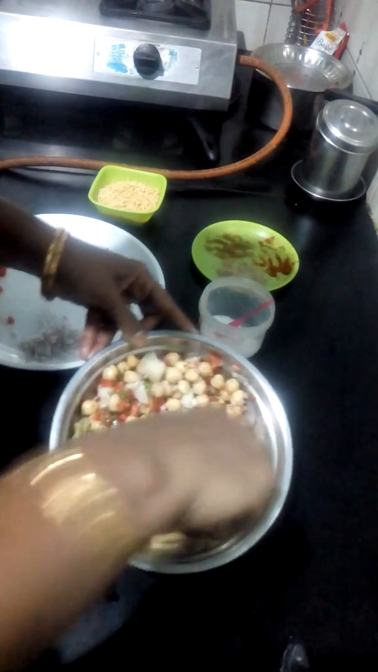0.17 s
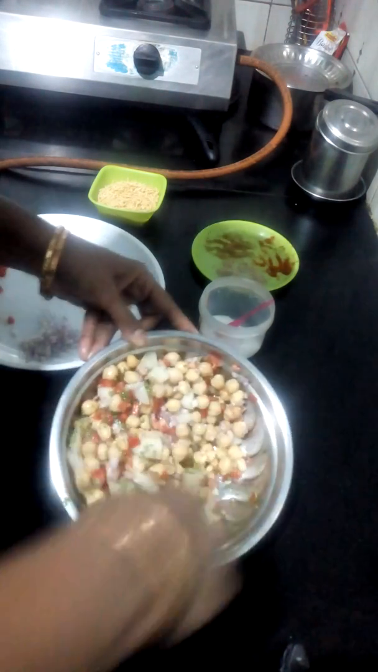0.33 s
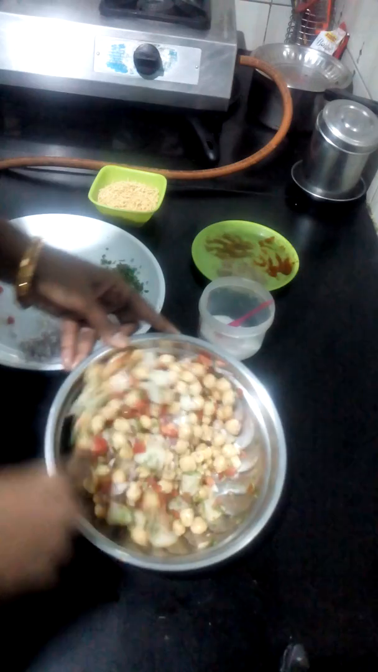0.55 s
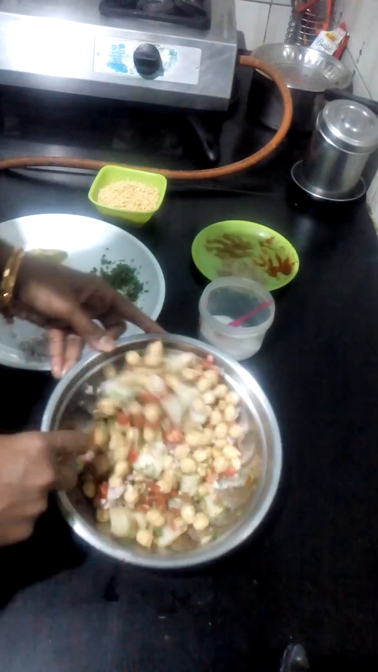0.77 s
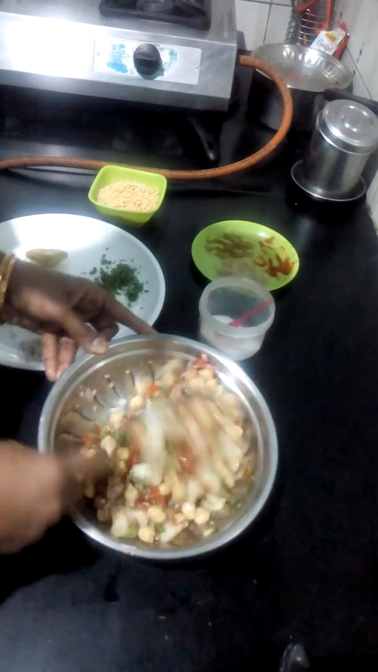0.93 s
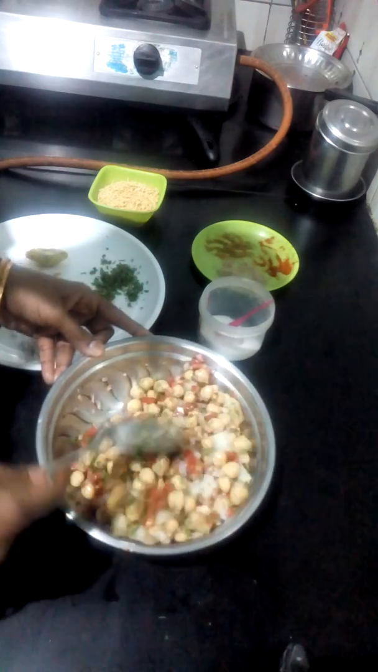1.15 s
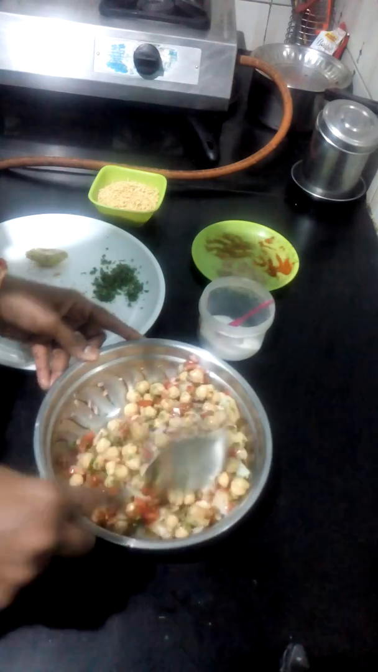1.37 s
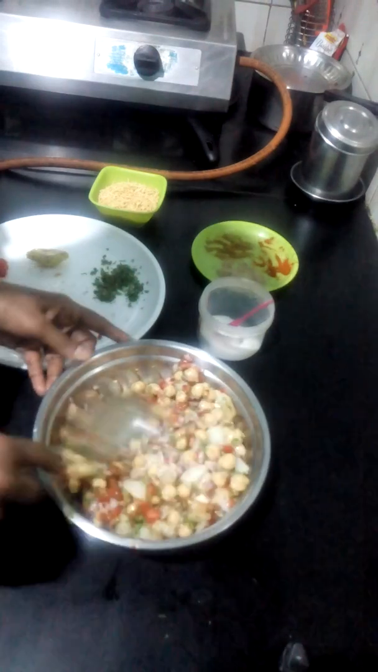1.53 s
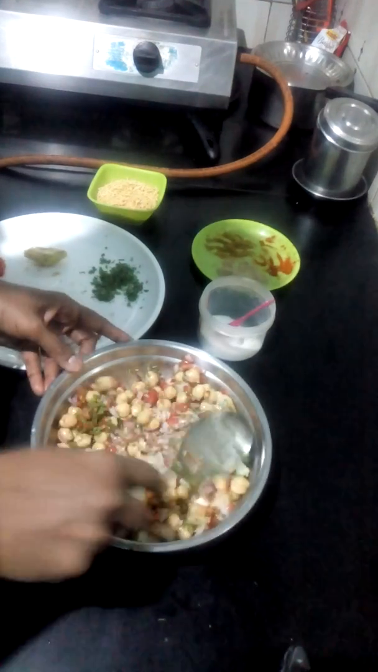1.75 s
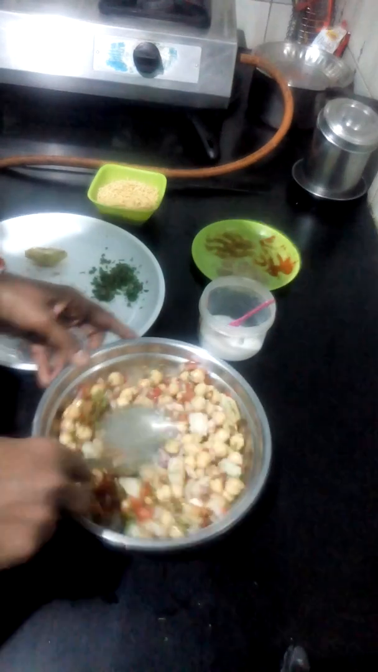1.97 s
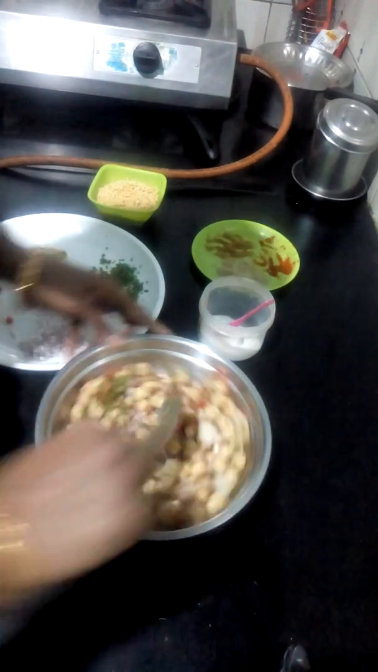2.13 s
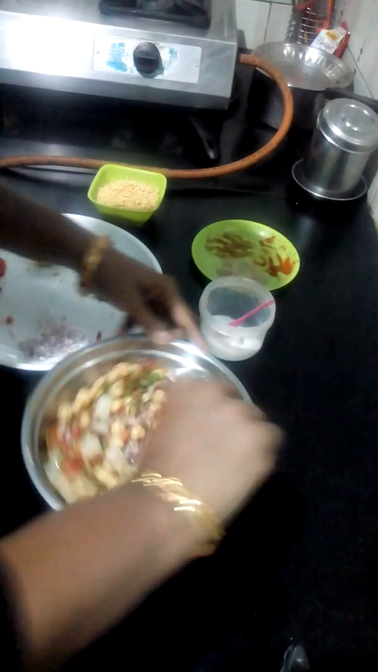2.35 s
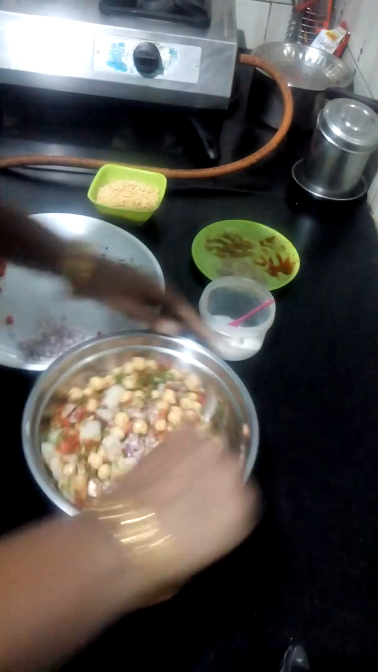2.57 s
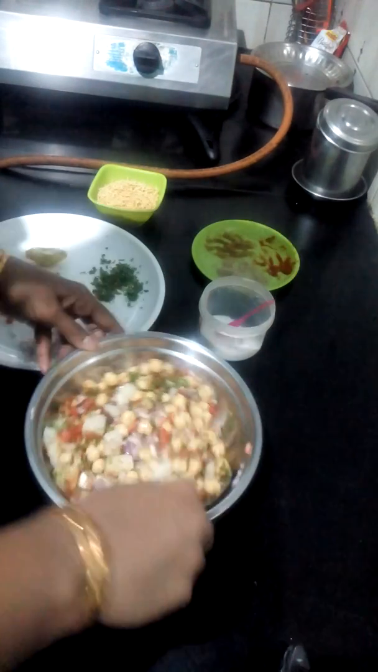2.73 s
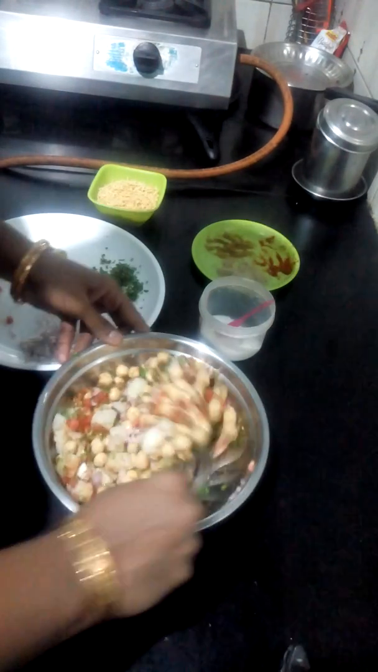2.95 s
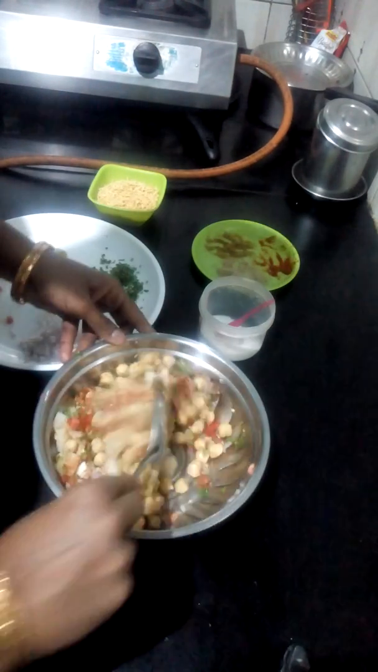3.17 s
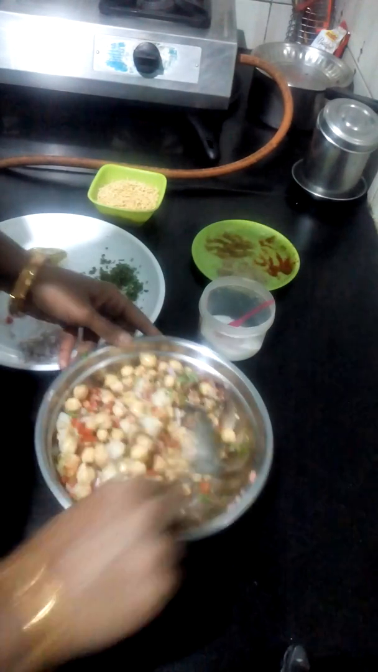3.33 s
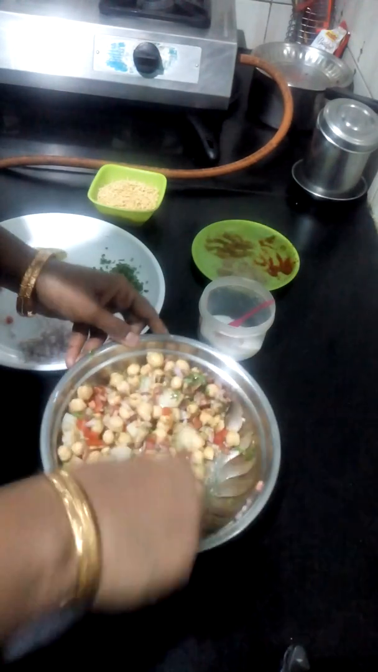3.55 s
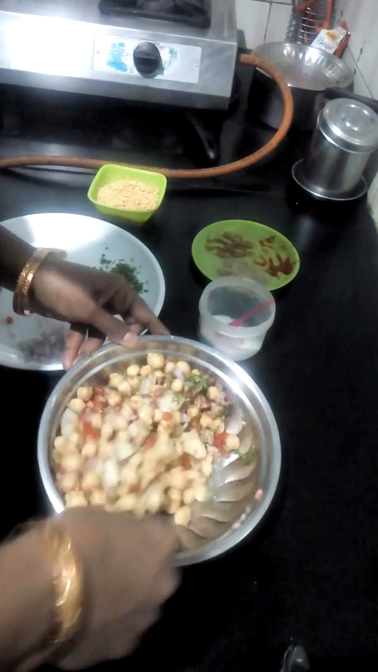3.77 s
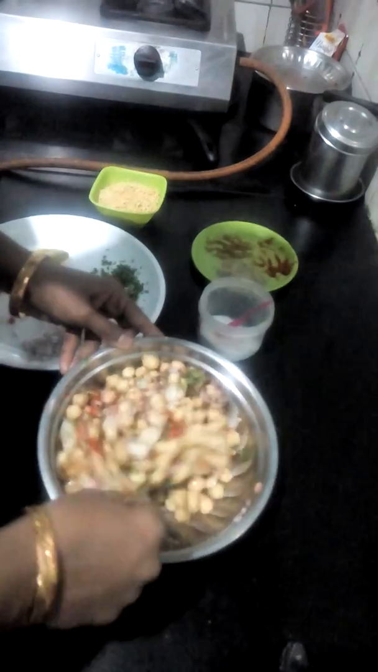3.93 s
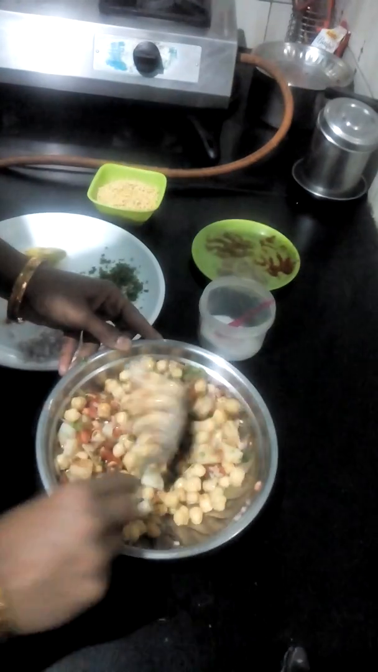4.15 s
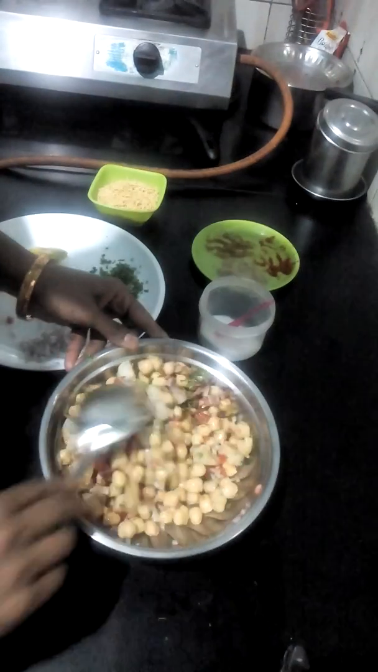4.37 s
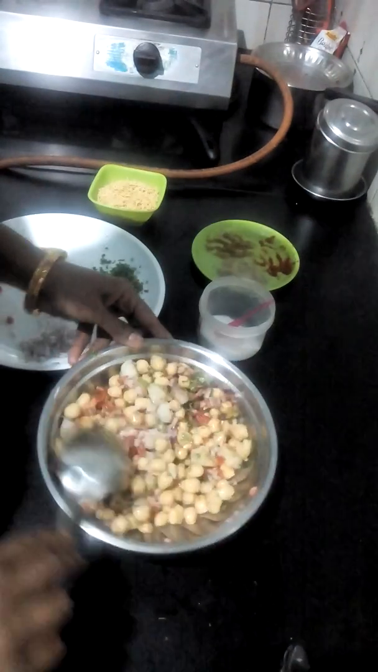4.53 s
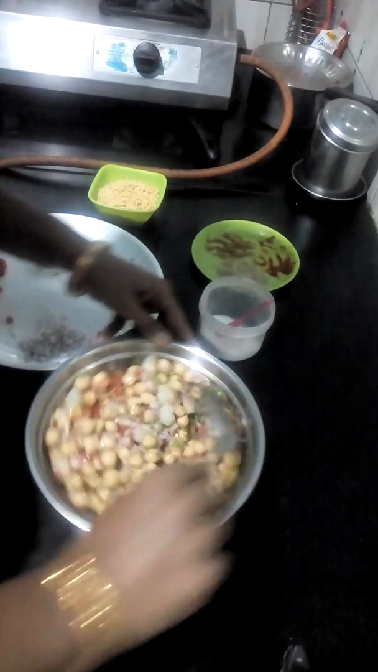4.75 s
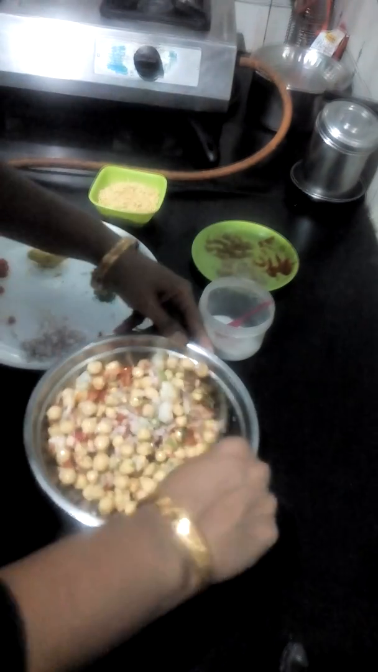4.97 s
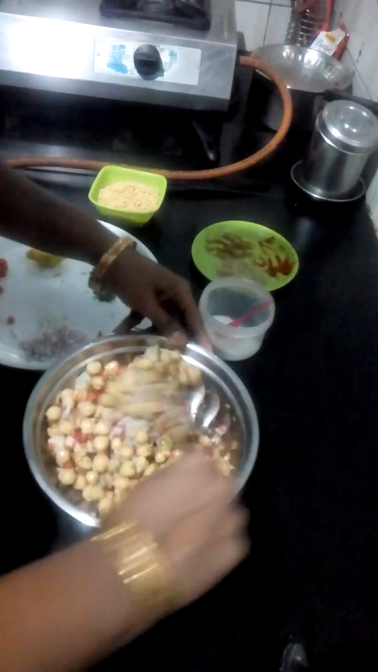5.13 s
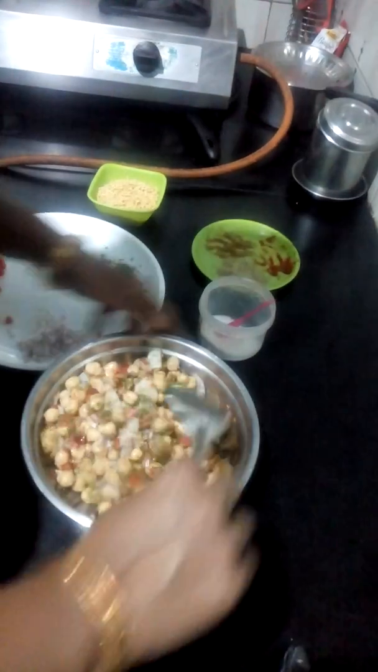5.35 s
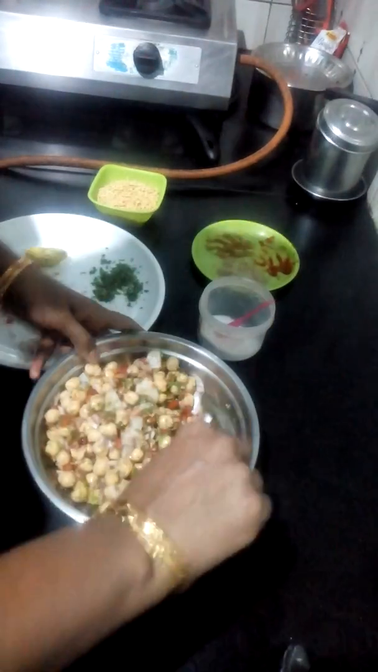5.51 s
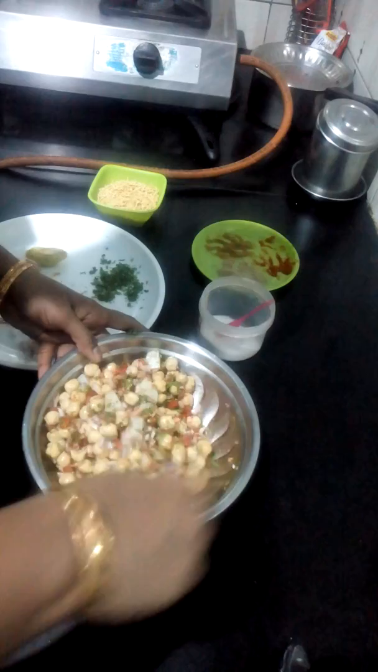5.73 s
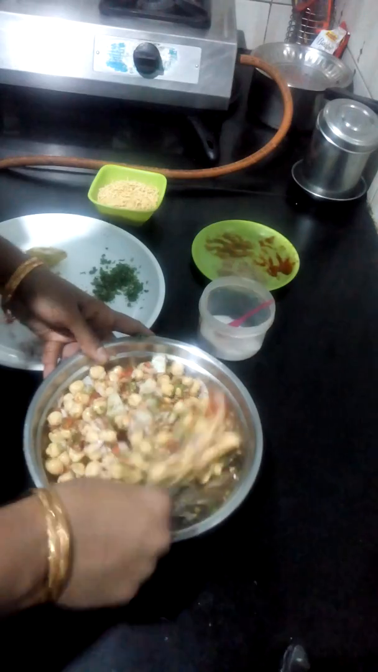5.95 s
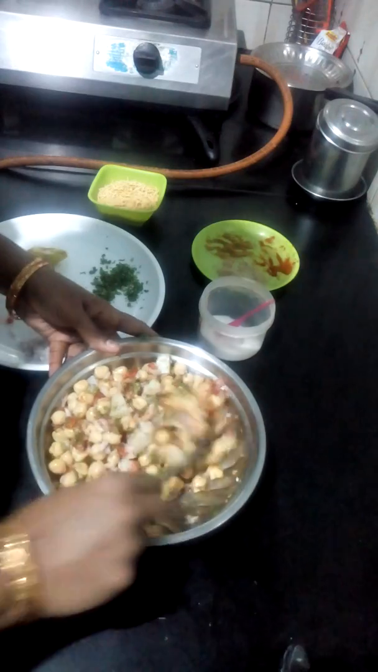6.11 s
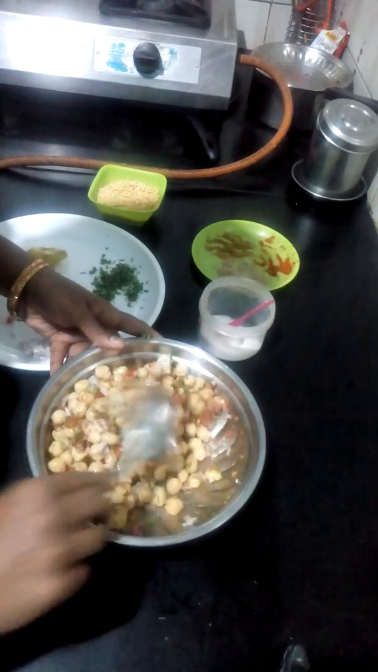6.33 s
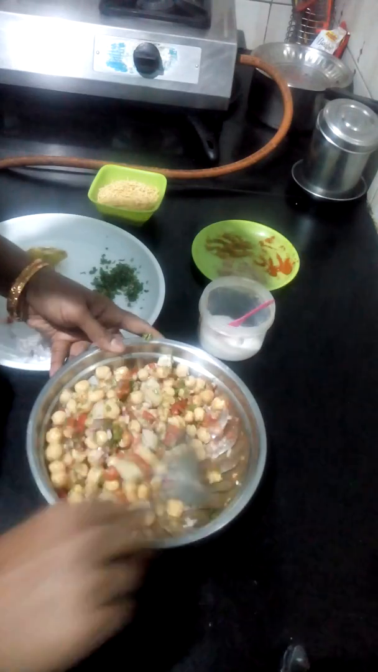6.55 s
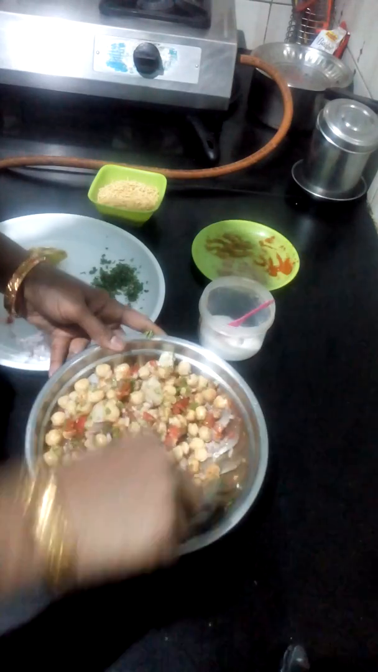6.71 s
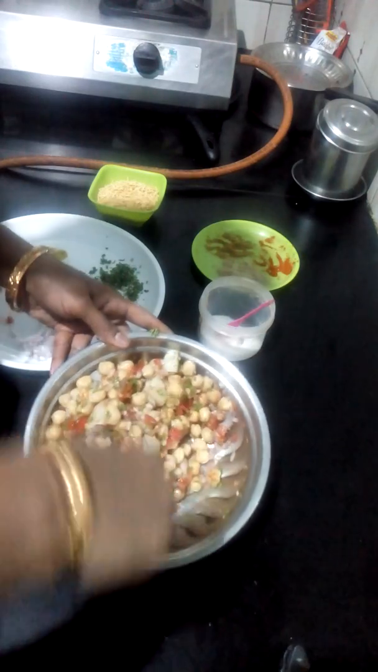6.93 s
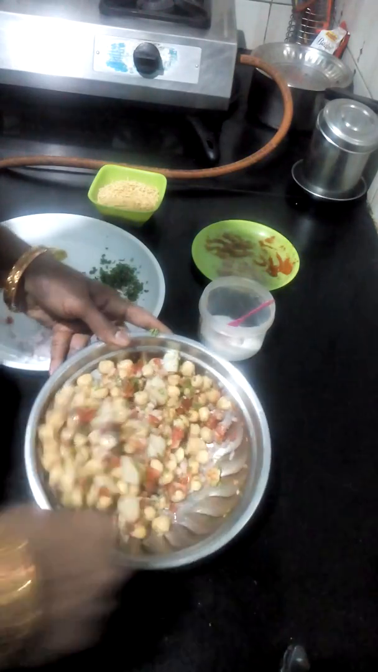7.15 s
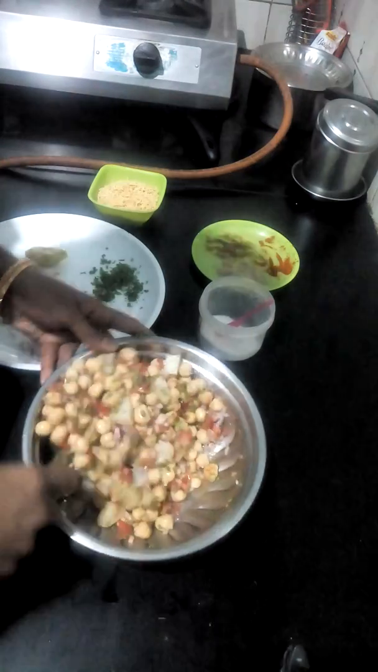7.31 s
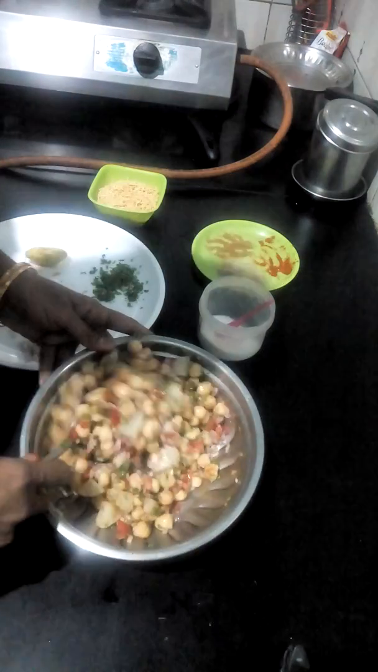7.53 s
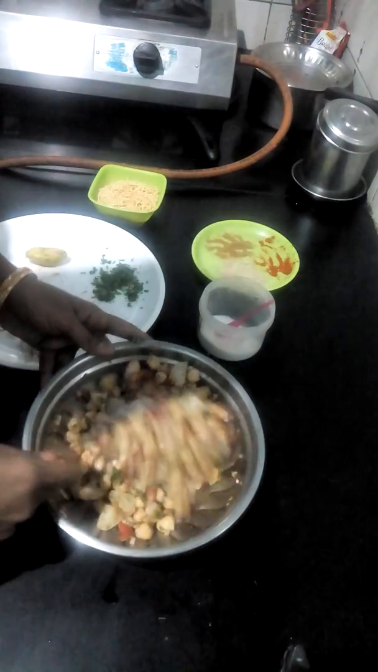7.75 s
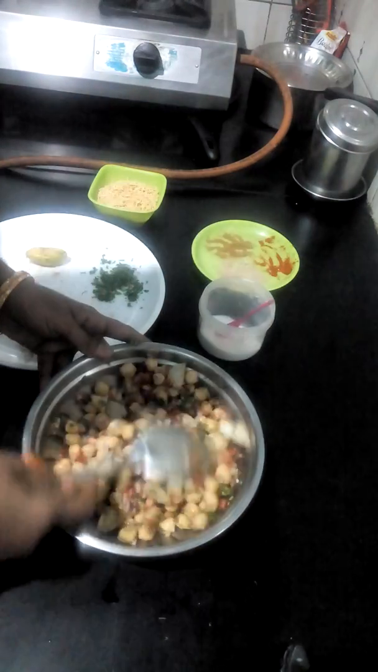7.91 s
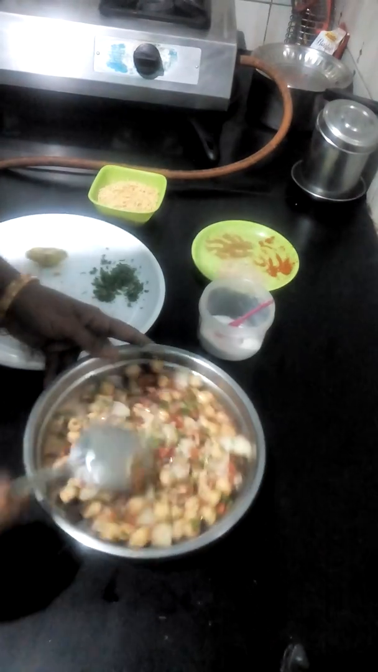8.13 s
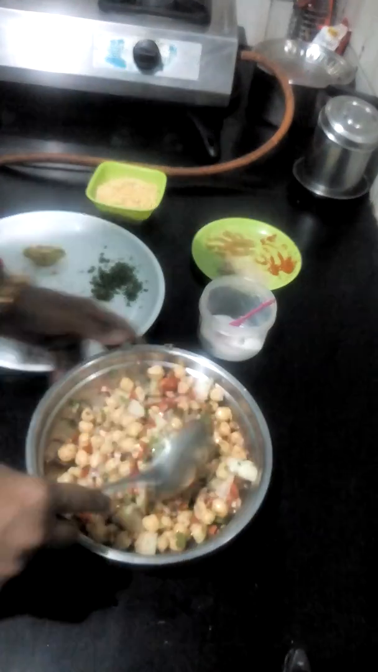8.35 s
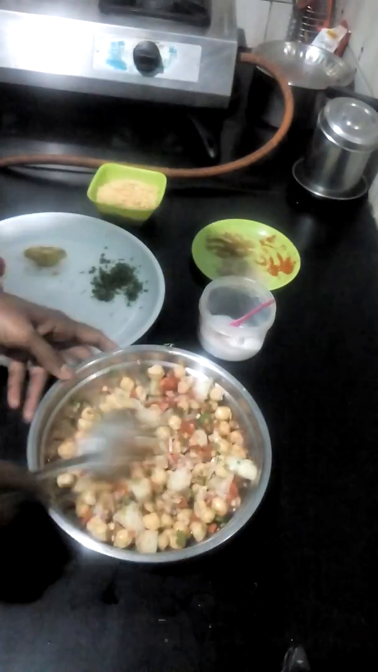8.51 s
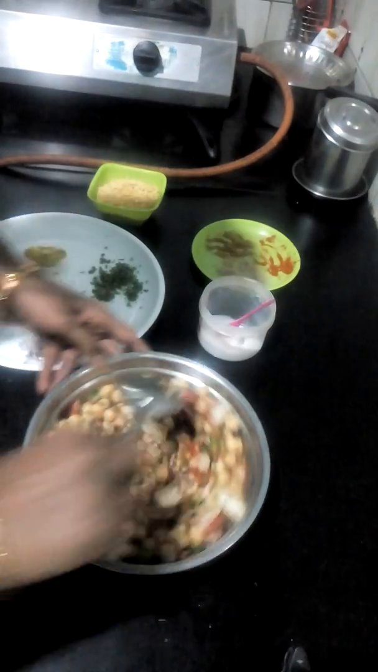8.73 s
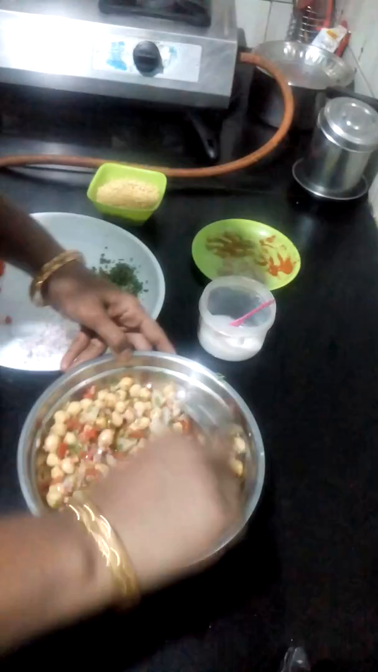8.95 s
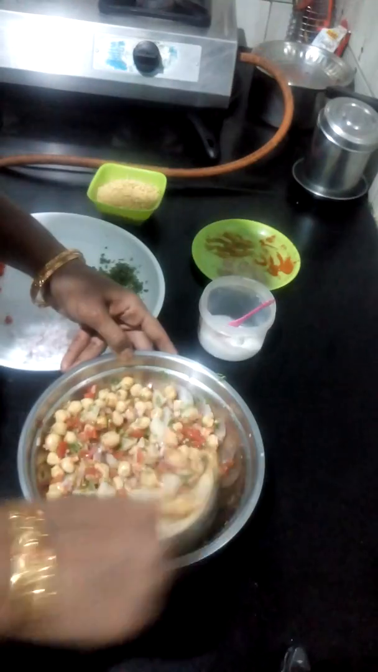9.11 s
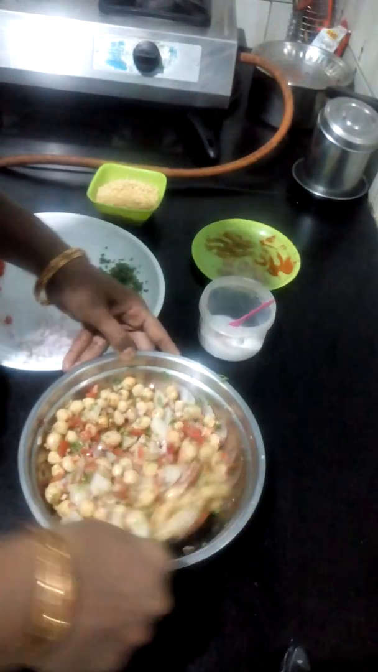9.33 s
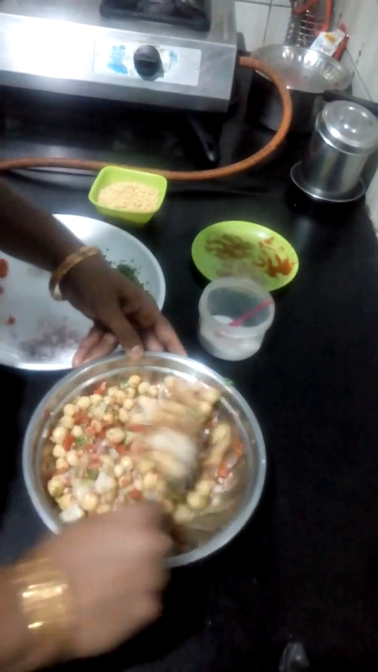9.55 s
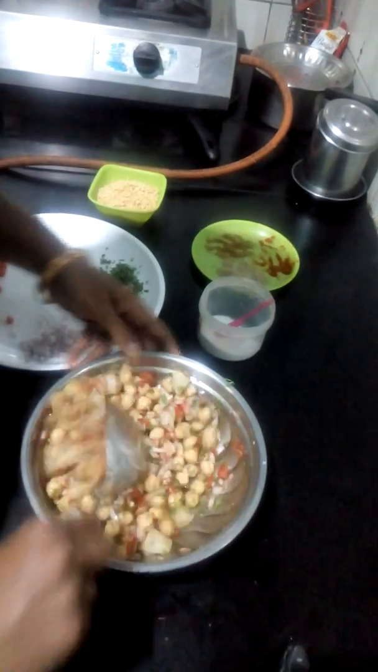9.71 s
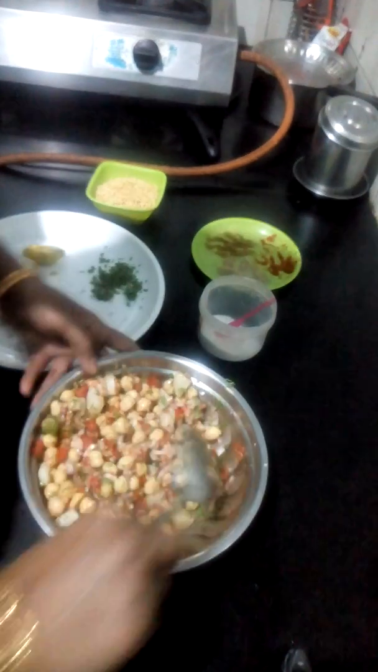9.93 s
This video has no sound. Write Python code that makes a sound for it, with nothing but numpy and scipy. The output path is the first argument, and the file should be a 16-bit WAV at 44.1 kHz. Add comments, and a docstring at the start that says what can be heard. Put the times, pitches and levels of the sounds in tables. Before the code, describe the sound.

Close up, a metal spoon knocks into a bowl and rasps along its wall, first busily, then in separated strokes with quiet gaps. Wet lumps of food patter back after the strokes, most thickly past the middle. Small high bangle rings and dull worktop thumps join in. The indoor room is small, with short reflections, faint low hum and light hiss; the stereo sound leans left.

```python
"""Knock, grate, rustle, plop: a steel spoon turns a chickpea salad in a steel bowl, in a small, quiet kitchen.
Seven short strokes knock (noise chatter, short bowl modes) and grate (stick-slip snaps through the same steel).
Some slips rasp on a gliding note, and hard pushes boom in the worktop. Wet food rustles as sparse ticks and
plops back as showers of soft lumps; the free spoon and bangles ring as small sets of dying modes.
Behind it lie low room noise, a wavering hum and a thin hiss that sets in, overshoots and settles."""
import sys
import numpy as np
from scipy import signal
from scipy.fft import rfft
from scipy.io import wavfile
from scipy.ndimage import uniform_filter1d

SR = 44100
rng = np.random.default_rng(int(sys.argv[2]) if len(sys.argv) > 2 else 0)


def log_audio(samples):
    """Write samples as a 16-bit WAV file to the path given in sys.argv[1]."""
    # one column per channel
    frames = np.atleast_2d(samples).T
    # limit to full scale, then quantise
    limited = np.clip(frames, -1, 1)
    pcm = np.round(limited * 32767).astype(np.int16)
    wavfile.write(sys.argv[1], SR, pcm)


N = 440118
TIME = np.arange(N) / SR

# Spoon against bowl. Each row: start in seconds, strength in dB before the trim of all knocks,
# weight of the low tones in dB against the strength, brightness in dB against the strength, contact time in ms.
KNOCKS = [(0.0357, -38, -7, -3, 2.6), (0.1139, -44, -17, -7, 1.3), (0.353, -37, -10, -7, 1.8),
          (0.3663, -40, -0.5, -5, 14), (0.4665, -30, -17.5, -7.5, 5), (0.613, -33, -11, -17.5, 2.4),
          (2.35, -29.3, -1.5, -9.5, 2.3), (2.565, -41, -21.5, -13, 1.1), (2.7869, -46, -26.5, -19, .5),
          (2.8127, -31, -16, -9, 1.7), (3.4317, -30.5, -11.5, -10.5, 1.6), (3.443, -35.5, -10, -5, 7.7),
          (3.4603, -35, -5, -13, 1.5), (3.5863, -34, -8.5, -5.5, 1.2), (3.7013, -35, -5, -13, 3.7),
          (3.798, -43.5, -13, -22, 7), (3.8753, -32.5, -1.5, -22, 2.8), (5.5048, -35.5, -2.5, -11, 2.5),
          (5.518, -33, -14, -10, 13), (5.712, -44, -20, -4, 3.1), (5.744, -45, -10, -22, 9),
          (6.607, -46.5, -15, -10, 0.63), (6.6194, -36.5, 1, -7.5, 1.3), (6.689, -63, -19, -1, 1.2),
          (6.782, -39, 0, -11, 7.4), (6.8656, -42.5, -18, -13, 6), (6.997, -39, 3, -24, 4),
          (7.072, -44, -23, -9.5, 2.9), (7.2795, -39, -11, -13.5, 1.6), (8.922, -34, -9.5, -5.5, 3),
          (9.018, -34, -8.5, -8.5, 2.8), (9.04, -37, -19, -21, 7), (9.22, -42.5, -6, -16, 2.4),
          (9.411, -40, -51, -8.5, 5)]
# Edges in Hz of a knock's four bands: thump, body, clank and brightness.
KNOCK_BAND_EDGES = [180, 550, 1300, 7500, 15500]
# One short curve a stroke. Each row: time in seconds, relative pressure on the wall in dB,
# relative hiss of the spoon's edge in dB.
STROKES = [
    [(0.05, -36.5, -55), (0.15, -51, -51.5), (0.24, -38.5, -48), (0.32, -51, -68), (0.4, -42, -50),
     (0.5, -34, -57), (0.56, -52, -58), (0.6, -35, -56), (0.65, -46, -52)],
    [(2.37, -34.5, -53), (2.44, -39.5, -49.5), (2.5, -42.5, -56), (2.61, -49, -55.5), (2.66, -45.5, -48.5),
     (2.76, -57, -83), (2.81, -41, -50)],
    [(3.45, -38, -47), (3.52, -38, -50), (3.66, -53, -60), (3.78, -40, -52.5), (3.88, -51.5, -59),
     (3.96, -41.5, -53), (4.01, -52, -69)],
    [(5.52, -53, -63), (5.6, -41.5, -48.5), (5.7, -44.5, -52.5), (5.77, -53, -60), (5.88, -43, -55),
     (5.93, -37.5, -46), (5.97, -55, -76)],
    [(6.63, -41, -66), (6.71, -49.5, -58), (6.76, -43, -54), (6.82, -45.5, -54), (6.89, -40.5, -50.5),
     (6.99, -42, -56)],
    [(7.01, -44, -64), (7.1, -50.5, -61), (7.17, -43.5, -61), (7.21, -48.5, -62), (7.26, -42.5, -62)],
    [(8.94, -40, -55), (9.06, -48.5, -50.5), (9.13, -40.5, -50), (9.21, -41.5, -50.5), (9.27, -47.5, -62),
     (9.37, -53.5, -63), (9.43, -40, -52), (9.48, -56, -64)],
]
# How each stroke digs in. Each row: extra thump of its first blows in dB, relative rumble of the pushed food in dB,
# fall of that rumble in dB per second as food spills off the spoon.
LOADS = [(24, -53.5, 4.5), (1, -43, 77), (18.2, -51, 3.5), (19.9, -46, 110), (9, -48, 16), (10, -51.5, 61),
         (5, -54.5, 28)]
# The spoon rasps on one gliding note. Each row: start in seconds, end in seconds, start pitch in Hz,
# end pitch in Hz, level in dB before the trim of all rasps.
RASPS = [(0.06, 0.118, 553, 700, -51), (0.234, 0.316, 394, 480, -48.5), (2.324, 2.338, 4800, 4840, -42.5),
         (2.681, 2.702, 3280, 1650, -41.5), (3.784, 3.826, 2600, 1680, -40.5),
         (3.902, 4.003, 1400, 900, -58), (4.703, 4.99, 1920, 2520, -67.5), (4.752, 4.95, 4200, 4670, -68),
         (4.9, 4.966, 5400, 5900, -54), (5.73, 5.77, 1450, 1220, -49.5), (5.799, 5.93, 1430, 1790, -52.5),
         (6.005, 6.112, 1400, 1450, -67), (6.986, 7.026, 334, 262, -43), (7.28, 7.32, 4320, 4480, -49),
         (8.258, 8.336, 2140, 2450, -67), (9.147, 9.363, 2050, 2390, -50)]
# The bowl rocks on the worktop. Each row: start in seconds, level in dB before the trim of all bumps.
BUMPS = [(0.038, -60), (1.248, -60), (3.435, -52), (3.699, -57), (3.878, -68), (6.619, -64), (6.997, -54),
         (7.647, -64)]
# Spoonfuls falling back. Each row: start in seconds, level in dB before the trim of all plops,
# firmness (pat over thud) in dB, wetness in dB against the level.
PLOPS = [(0.835, -58.5, -7, -27), (0.877, -66, -11, -22.5), (0.957, -59.5, -12.5, -24),
         (0.988, -57.5, -10, -27), (1.03, -62, -2, -13.5), (1.129, -65.5, -1, -8.5), (1.559, -58, 0.5, -11),
         (1.624, -67.5, 1, -9.5), (3.371, -65, 8, 8), (4.045, -55, 11, -16), (4.182, -58, 12, -21),
         (4.205, -62.5, 9, -3), (4.518, -61.5, -1, -8.5), (4.713, -61.5, -8, -19), (4.925, -70, 16, 13),
         (5.279, -63, 11, -34), (6.057, -71, -6, 7.5), (6.5027, -53, -1.5, -23.5), (6.585, -63, 6, -6),
         (7.516, -52.5, 8.5, -24), (7.545, -55.5, 2, -19.5), (7.621, -53, -17, -18.5),
         (7.815, -57.5, -15.5, -9.5), (7.99, -64.5, 0, -6), (8.106, -54.5, -12, -16.5),
         (8.135, -65.5, -11, -2.5), (8.234, -62, -6, -14), (8.565, -48.5, 20.5, -21.5),
         (9.722, -58, 0, -13.5), (9.76, -53, 15, -25), (9.786, -53, 6, -13)]
# Edges in Hz of a plop's four bands: thud, pat, squelch and tick.
PLOP_BAND_EDGES = [130, 450, 1200, 3200, 8000]
# The spoon ringing free. Each row: start in seconds, pitch in Hz, level in dB, time to fall by 60 dB in seconds.
SPOON_RINGS = [(7.281, 4480, -46, 0.061), (8.387, 3990, -60.5, 0.05), (9.726, 4495, -69.5, 0.33),
               (9.785, 4500, -66, 0.18)]
# Bangles touching. Each row: start in seconds, level in dB.
TINKLES = [(0.227, -53), (0.261, -42.5), (0.287, -41), (0.358, -47), (.475, -35), (1.363, -54),
           (2.325, -58), (5.498, -53), (6.686, -41), (8.572, -71), (8.639, -63)]

# Modes of the loaded bowl. Each row: pitch in Hz, relative level in dB, time to fall by 60 dB in seconds.
BOWL_MODES = [(242.8, -1, .28), (274, 0.5, 0.19), (348, -2, 0.22), (409.2, 0, 0.22), (495, 2, 0.18),
              (618.5, -14.5, 0.13), (816, 2.5, 0.16), (899, -2, 0.24), (955, -8, 0.57), (1382, -8.5, 0.4),
              (1414, -6, .17), (1640, -17.5, 0.17), (1730, -6, 0.13), (1930, 0, 0.18), (2190, 0.5, 0.13),
              (2590, 1.5, 0.12), (2624, -2, 0.3), (3200, -6, 0.19), (3456, -22, .16), (3790, -6.5, 0.14),
              (4000, -3.5, 0.24), (4090, -11, .18), (5290, 6, 0.07), (5420, -5.5, .2), (5620, -5.5, 0.26),
              (5830, -11, 0.3), (6520, -10, 0.15), (6910, -4, 0.29), (8600, 9, 0.22)]
# Modes of the worktop. Each row: pitch in Hz, relative level in dB, time to fall by 60 dB in seconds.
WORKTOP_MODES = [(69, -9.5, 0.85), (89, -25, 0.34), (110, -5, 0.19), (124.5, -2.5, 0.63), (163.4, -8, .25),
                 (196, -9, 0.34)]
# Modes of a bangle. Each row: pitch in Hz, relative level in dB, time to fall by 60 dB in seconds.
BANGLE_MODES = [(1370, -23.5, 0.11), (4400, -18.5, 0.079), (5700, -14, .1), (7000, -19, .08),
                (8240, -18, 0.08), (8700, -9.5, 0.11), (11650, -15, 0.068), (14460, -10, 0.092),
                (14400, -6.5, .11), (15070, -7, 0.072), (15400, -0.5, 0.053)]
# Close modes of the spoon. Each row: multiple of the main pitch, relative level in dB.
SPOON_MODES = [(.9, -28), (0.952, 1), (0.978, 23), (1, 5), (1.04, -14)]

# Colour of a hard contact. Each row: frequency in Hz, relative density in dB per Hz.
CLANK_COLOUR = [(59, -39.5), (100, -2), (166, -24), (253, -2.5), (640, -3.5), (758, -14), (917, -3.5),
                (1290, -4.5), (2220, 2.5), (2930, -1.5), (4100, 3), (4560, -3.5), (6810, -1), (11300, -21),
                (15500, -11)]
# Colour of grating steel. Each row: frequency in Hz, relative density in dB per Hz.
GRATE_COLOUR = [(88, -34), (150, -14.5), (381, -9), (481, -18.5), (561, -9.5), (1110, -15), (1200, -13),
                (1760, -14.5), (2180, 0), (2980, -7.5), (3830, -3), (5760, -6), (8660, -9), (10700, -21),
                (15500, -9.5)]
# Colour of damp food shifting. Each row: frequency in Hz, relative density in dB per Hz.
RUSTLE_COLOUR = [(150, -14.5), (400, -0.5), (1000, -7), (2100, 0.5), (3000, -6), (6000, -7.5), (9000, -18),
                 (15000, -29)]
# Colour of the still kitchen. Each row: frequency in Hz, relative density in dB per Hz.
STILL_COLOUR = [(20, -29), (35, -14), (52, -21), (64, -3), (88, -11.5), (120, -4.5), (180, -6.5),
                (320, -14.5), (600, -17), (1150, -27), (2200, -26.5), (3300, -32.5), (6000, -37),
                (12000, -43), (15500, -34.5)]
# Faint hum. Each row: pitch in Hz, level in dB.
HUM = [(64.6, -82.5), (86.1, -73), (119, -74.5), (237, -80.5)]
# Colour of the thin hiss. Each row: frequency in Hz, relative level in dB.
HISS_COLOUR = [(200, -6), (1300, -8.5), (2300, -0.5), (3200, -1), (6000, 3), (7200, 1.5), (8500, -8),
               (11000, -22), (15000, -11.5)]
# The kitchen's decay. Each row: frequency in Hz, time to fall by 60 dB in seconds.
KITCHEN_DECAY = [(200, 0.42), (530, 0.29), (1400, 0.39), (3700, 0.34), (9700, 0.3), (15000, 0.19)]
# The two microphones. Each row: frequency in Hz, left minus right in dB.
EARS = [(60, 11), (92, 3), (140, 4.5), (210, 7.5), (330, 5.5), (500, 10), (770, 8.0), (1170, 11.5),
        (1790, 18), (2740, 17), (4190, 13.5), (6410, 8.5), (9810, -0.5), (15000, 8)]

# a blow at the start of a stroke lands on the bowl's floor: it thumps deeper and rings more freely than on the wall
PLUNGE_S = 0.09  # how fast the blows move from floor to wall
ENTRY_S = 0.05  # the first blow comes at most this long before the grating
WALL_THUMP_DB = -11  # thump against body
WALL_RING_DB, PLUNGE_RING_DB = -9, 9  # ring against chatter on the wall, and the floor's extra
CRUMB_DB, CRUMB_FIRMNESS_DB, CRUMB_WET_DB = -72, -9, -9.5  # middle values, in the columns of PLOPS
WET_TICK_DB = -1  # the tick of a wet landing, against its squelch
STILL_DB = -68
HISS_START_S, HISS_RISE_S, HISS_SETTLE_S = 1.87, 0.2, 0.59
HISS_BEFORE_DB, HISS_STEADY_DB, HISS_PEAK_DB = -87, -77, -64.5  # three parts that add up
LEAD = 9  # samples by which the direct sound reaches the left microphone first
EDGE_HZ = 15600  # upper band limit


def knocks(room_db=0.0, level_db=-1.47):
    """Each blow has its own strength and hardness; its place in the stroke sets how it thumps and rings."""
    out = np.zeros((2, N))
    starts = np.array([rows[0][0] for rows in STROKES])
    for s, db, weight_db, bright_db, contact_ms in KNOCKS:
        stroke = np.searchsorted(starts[1:], s + ENTRY_S)
        plunge = np.exp(-max(s - starts[stroke], 0) / PLUNGE_S)  # 1 on the floor, 0 on the wall
        body_db, thump_db = split(db + weight_db, WALL_THUMP_DB + LOADS[stroke][0] * plunge)
        tap = steel(contact_ms, WALL_RING_DB + PLUNGE_RING_DB * plunge, room_db)
        blow = colour(tap, CLANK_COLOUR)
        add(out, s, weigh(blow, KNOCK_BAND_EDGES, [thump_db, body_db, db, db + bright_db]))
    return amp(level_db) * out


def steel(contact_ms, ring_db, room_db, shiver_db=0, shiver_s=0.011, size=18000):
    """A tap in the kitchen: brief chatter, a shiver of crowded modes choked by the food, clear modes, the room."""
    t = np.arange(size) / SR
    u = t * 1000 / contact_ms  # time in contacts
    chatter = unit_energy(rng.standard_normal(size) * u ** 0.47 * np.exp(-1.3 * u))
    shiver = unit_energy(rng.standard_normal((2, size)) * np.exp(-t / shiver_s))
    near = chatter + amp(ring_db) * ring(BOWL_MODES, scatter_db=3.5, size=size)
    both = np.array([near, np.pad(near, (LEAD, 0))[:size]])
    return unit_energy(spot_colour(both + amp(shiver_db) * shiver + amp(room_db) * room_tail()))


def spot_colour(x, ripple_db=4.0, spacing_hz=75, count=220):
    """Each spot of the wall feeds some of the crowded modes and starves others."""
    hz = spacing_hz * np.arange(1, count + 1)
    depth_db = ripple_db * np.clip(hz / 900, 0, 1)  # shallower in the lows
    ripple = depth_db * np.clip(rng.standard_normal(count), -2, 2)
    return colour(x, np.transpose([hz, ripple]), size=4096)


def scrape(rows, load_db, spill_db_per_s, grate_db=0.1, edge_db=4.5, ring_db=-9, room_db=-1, slip_ms=0.57,
           release_s=0.012, count=10):
    """The spoon's edge grates along the wall, from one spot of steel to the next, pushing food that spills away."""
    s, pressure_db, hiss_db = np.transpose(rows)
    t = np.arange(s[0] - release_s, s[-1] + 0.4, 1 / SR)  # leaves room for the last ring
    touch = np.interp(t, [t[0], s[0], s[-1], s[-1] + release_s], [0, 1, 1, 0])
    rumble_db = load_db - spill_db_per_s * (s - s[0])
    layers = [((180, 950), rumble_db), ((1200, 7600), pressure_db + grate_db), ((7900, 16000), hiss_db + edge_db)]
    snaps = colour(slips(len(t)), GRATE_COLOUR)[0]
    force = np.zeros(len(t))
    for band_hz, db in layers:
        band = signal.butter(3, band_hz, "band", fs=SR, output="sos")
        force += touch * unit(signal.sosfilt(band, snaps)) * amp(np.interp(t, s, db))
    # cross-fade through the spots, each with its own steel
    spot = np.interp(t, [s[0], s[-1]], [0, count - 1])
    out = np.zeros((2, len(t)))
    for k in range(count):
        share = np.sqrt(np.maximum(1 - abs(spot - k), 0))
        wall = steel(slip_ms, ring_db, room_db)
        out += signal.fftconvolve((force * share)[None], wall, axes=1)[:, :len(t)]
    return t[0], out


def slips(length, per_s=3000, spread_db=2.0, judder_db=3.0, judder_s=0.0084):
    """Tiny stick-slip snaps of uneven size; a slow random judder makes loud ones come in clumps."""
    sign = rng.choice([-1, 1], length)
    size = np.minimum(rng.exponential(1, length), 4)
    snap = rng.random(length) < per_s / SR
    judder = unit(uniform_filter1d(rng.standard_normal(length), max(int(judder_s * SR), 1)))
    return sign * snap * amp(spread_db * size + judder_db * judder)


def rasps(room_db=-2, level_db=-2.0):
    """Slips feed a narrow and then a wide resonance that glide with the point of contact."""
    out = np.zeros((2, N))
    for start, end, start_hz, end_hz, db in RASPS:
        hz = np.linspace(start_hz, end_hz, max(round((end - start) * SR), 256))
        narrow = resonate(slips(len(hz)), hz, 0.147 * start_hz)
        note = unit(resonate(narrow, hz, 0.756 * start_hz))
        note = amp(db + level_db) * note * signal.windows.tukey(len(hz), 0.5)
        add(out, start, in_kitchen(np.pad(note, (0, SR // 3)), room_db))
    return out


def bumps(level_db=-0.5, size=1323):
    """A hard push rocks the bowl, and the worktop booms faintly in its low modes."""
    out = np.zeros((2, N))
    for s, db in BUMPS:
        boom = ring(WORKTOP_MODES, scatter_db=2.5)
        boom = boom / boom[:size].std()  # level of the first 30 ms
        add(out, s, amp(db + level_db) * np.array([boom, boom]))
    return out


def plops(fall_s=0.017, lumps_per_s=350, smear=0.075, settle=0.41, settle_s=0.034, settle_per_s=70, room_db=-1.0,
          level_db=-1.65, size=14000):
    """A spoonful lands as a short shower of soft lumps among damp hollows; a few more slip and settle afterwards."""
    out, t = np.zeros((2, N)), np.arange(size) / SR
    softness = [(60, -14.5), (200, 4.5), (900, 10.0), (1400, -7.0), (5000, -11.0), (9000, -18.5), (15000, -36)]
    for s, db, firmness_db, wet_db in PLOPS + crumbs():
        thud_db, pat_db = split(db, firmness_db)
        squelch_db = db + wet_db
        push = rng.standard_normal(size)
        landing = rng.random(size) < lumps_per_s / SR
        settling = rng.random(size) < settle_per_s / SR
        lumps = push * (smear + landing) * np.exp(-t / fall_s)
        lumps += push * settle * settling * np.exp(-t / settle_s)
        hollows = np.zeros(size)
        for hz in (260, 480, 780, 2300, 3600):
            hollows += resonate(lumps, np.full(size, hz * rng.uniform(0.795, 1.147)), hz * 0.068)
        soft = in_kitchen(colour(lumps + 7.0 * hollows, softness), room_db)
        add(out, s, weigh(soft, PLOP_BAND_EDGES, [thud_db, pat_db, squelch_db, squelch_db + WET_TICK_DB]))
    return amp(level_db) * out


def crumbs(spread_db=2.5, count=25):
    """Stray lumps drop at random moments between and among the spoonfuls: rows like those of PLOPS."""
    when = rng.random((count, 1)) * N / SR
    middle = np.array([CRUMB_DB, CRUMB_FIRMNESS_DB, CRUMB_WET_DB])
    return np.hstack([when, middle + rng.uniform(-spread_db, spread_db, (count, 3))]).tolist()


def rustle(level_db=-78, swell_db=5.5, swell_s=0.12, room_db=-2):
    """The stirred food keeps shifting: sparse sticky ticks that swell and sink at random."""
    swell = unit(uniform_filter1d(rng.standard_normal(N), max(int(swell_s * SR), 1)))
    ticks = slips(N, per_s=900, spread_db=2.0, judder_db=3.5, judder_s=0.02)
    ticks = ticks * amp(swell_db * np.clip(swell, -2, 2))
    return amp(level_db) * unit(in_kitchen(colour(ticks, RUSTLE_COLOUR), room_db))


def free_spoon():
    """The spoon sings on a few close modes once it is clear of the food."""
    out = np.zeros((2, N))
    for s, hz, db, t60 in SPOON_RINGS:
        add(out, s, small_ring(db, [(hz * multiple, mode_db, t60) for multiple, mode_db in SPOON_MODES]))
    return out


def bangles():
    """Bangles tinkle on the wrist, each touch sounding their high, short modes."""
    out = np.zeros((2, N))
    for s, db in TINKLES:
        add(out, s, small_ring(db, BANGLE_MODES))
    return out


def small_ring(db, modes, room_db=-1, tick_db=-15, tick_s=0.003, size=1323):
    """A light touch of metal: a tick of noise starts the dying modes."""
    tone = ring(modes, scatter_db=3.5)
    tick = unit_energy(rng.standard_normal(len(tone)) * np.exp(-TIME[:len(tone)] / tick_s))
    sound = in_kitchen(tone + amp(tick_db) * tick, room_db)
    return amp(db) * sound / sound[:, :size].std()  # level of the first 30 ms


def still_air(apart=0.93):
    """Low room noise, partly common to both microphones."""
    noise = rng.standard_normal(N) + apart * rng.standard_normal((2, N))
    return amp(STILL_DB) * unit(colour(noise, STILL_COLOUR, size=16384))


def hum(waver=0.46):
    """Faint low tones, each slowly wavering in level and phase."""
    out = np.zeros(N)
    for hz, db in HUM:
        drift = unit(uniform_filter1d(rng.standard_normal(N), size=9000))
        out += amp(db) * unit((1 + waver * drift) * np.sin(2 * np.pi * hz * TIME + drift))
    return out


def hiss():
    """A thin noise that sets in, overshoots and settles."""
    age = np.maximum(TIME - HISS_START_S, 0)
    overshoot = amp(HISS_PEAK_DB) * np.exp(-np.maximum(age - HISS_RISE_S, 0) / HISS_SETTLE_S)
    flow = amp(HISS_BEFORE_DB) + np.minimum(age / HISS_RISE_S, 1) * (amp(HISS_STEADY_DB) + overshoot)
    return flow * unit(colour(rng.standard_normal((2, N)), HISS_COLOUR))


def in_kitchen(x, room_db):
    """The direct sound reaches the left microphone first; the room follows."""
    path = amp(room_db) * room_tail()
    path[0, 0] += 1
    path[1, LEAD] += 1
    return signal.fftconvolve(np.atleast_2d(x), path, axes=1)[:, :x.shape[-1]]


def room_tail(shared_hz=550, size=18000):
    """Dense reflections, each band dying at its own speed; long waves reach both microphones alike."""
    hz, t, z = signal.stft(rng.standard_normal((2, size)), SR, nperseg=256)
    same = 1 / (1 + (hz[:, None] / shared_hz) ** 2)
    z = np.array([z[0], same * z[0] + np.sqrt(1 - same ** 2) * z[1]])
    decay = amp(-60 * t / read(KITCHEN_DECAY, hz)[:, None])
    tail = signal.istft(z * decay, SR, nperseg=256)[1][:, :size]
    return unit_energy(tail * np.clip(np.arange(size) / SR / 0.0026, 0, 1))  # builds up over 2.6 ms


def ring(modes, scatter_db, size=16384):
    """Dying modes; each point of contact favours different ones."""
    hz, db, t60 = np.transpose(modes)[:, :, None]
    t = np.arange(size) / SR
    strength, side = rng.standard_normal((2, len(hz), 1))
    level = np.sign(side) * amp(db + scatter_db * strength - 60 * t / t60)
    return unit_energy((level * np.sin(2 * np.pi * hz * t)).sum(0))


def resonate(x, hz, width_hz):
    """A resonance of gain 1 that follows the curve hz: shift it down to 0 Hz, smooth, shift back."""
    turn = np.exp(2j * np.pi * np.cumsum(hz) / SR)
    r = np.exp(-np.pi * width_hz / SR)
    return 2 * (turn * signal.lfilter([1 - r], [1, -r], x / turn)).real


def weigh(sound, edges, levels_db, size=1323):
    """Tilts a blow smoothly so that its first 30 ms have about the given level in each band."""
    hz = np.fft.rfftfreq(2 * size, 1 / SR)
    power = abs(rfft(sound.mean(0)[:size], 2 * size) / size) ** 2
    points = []
    for lo, hi, db in zip(edges, edges[1:], levels_db):
        lift_db = db - 10 * np.log10(power[(hz > lo) & (hz <= hi)].sum() + 1e-20)
        points += [(lo * 1.15, lift_db), (hi / 1.15, lift_db)]  # flat inside, sloping across the edges
    return colour(sound, points)


def colour(x, points, size=2048):
    """Causal (minimum-phase) filter with the given (Hz, dB) shape."""
    log_gain = np.log(amp(read(points, abs(np.fft.fftfreq(size, 1 / SR)))))
    taps = np.fft.ifft(np.exp(np.conj(signal.hilbert(log_gain)))).real[:size // 2]
    return signal.fftconvolve(np.atleast_2d(x), taps[None], axes=1)[:, :x.shape[-1]]


def read(points, hz):
    """Reads a curve on a log-frequency axis."""
    f, value = np.transpose(points)
    return np.interp(np.log(hz + 1), np.log(f), value)


def split(db, tilt_db):
    """Shares a level between two bands, the second tilt_db above the first."""
    first = db - 10 * np.log10(1 + amp(tilt_db) ** 2)
    return first, first + tilt_db


def amp(db):
    """Decibels to gain."""
    return 10 ** (np.asarray(db) / 20)


def unit(x):
    """Scales to rms 1."""
    return x / np.sqrt(np.mean(x ** 2) + 1e-20)


def unit_energy(x):
    """Scales each channel to energy 1."""
    return x / np.sqrt(np.sum(x ** 2, -1, keepdims=True) + 1e-20)


def add(mix, s, sound):
    """Mixes a stereo sound in at time s."""
    part = mix[:, max(round(s * SR), 0):][:, :sound.shape[1]]
    part += sound[:, :part.shape[1]]


def scene():
    """All sources together."""
    mix = knocks() + rasps() + bumps() + plops() + rustle() + free_spoon() + bangles()
    mix += still_air() + hum() + hiss()
    for rows, (_, load_db, spill_db_per_s) in zip(STROKES, LOADS):
        add(mix, *scrape(rows, load_db, spill_db_per_s))
    return mix


def record(dry):
    """The right microphone faces away and loses the middle range; then the band limit."""
    # each pair of gains keeps the summed power
    left = [(hz, 10 * np.log10(2 / (1 + amp(-db) ** 2))) for hz, db in EARS]
    right = [(hz, 10 * np.log10(2 / (1 + amp(db) ** 2))) for hz, db in EARS]
    heard = np.vstack([colour(dry[0], left), colour(dry[1], right)])
    low_pass = signal.firwin(401, EDGE_HZ, window=("kaiser", 8), fs=SR)
    return signal.oaconvolve(heard, low_pass[None], "same")


dry = scene()
out = record(dry)
log_audio(out)
```